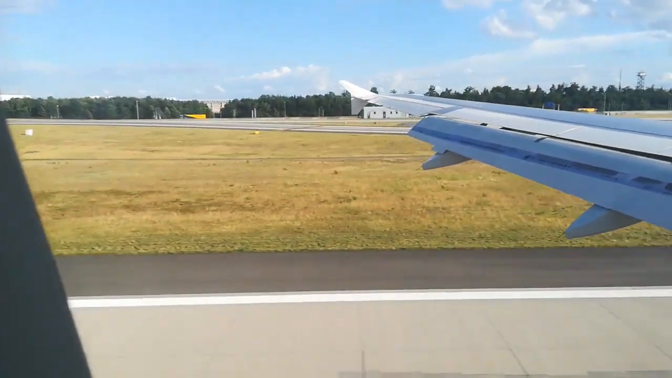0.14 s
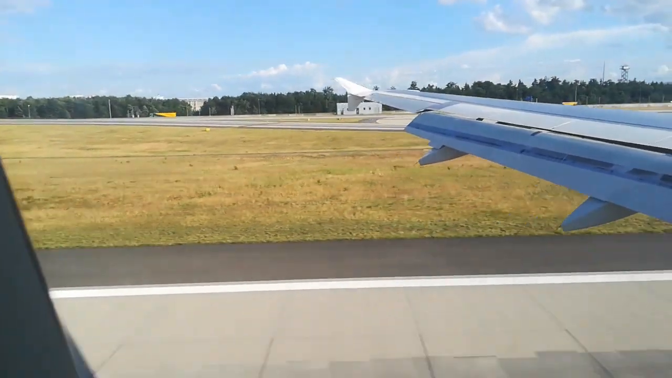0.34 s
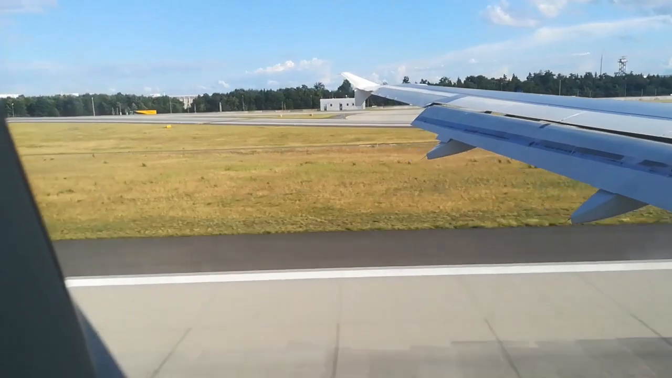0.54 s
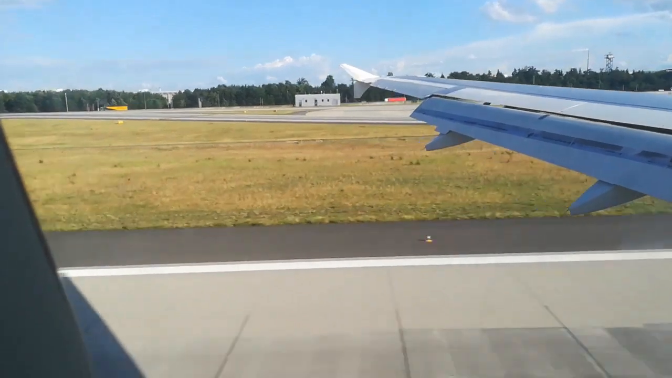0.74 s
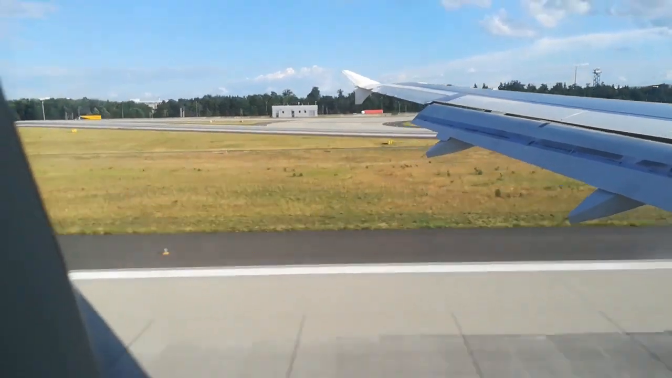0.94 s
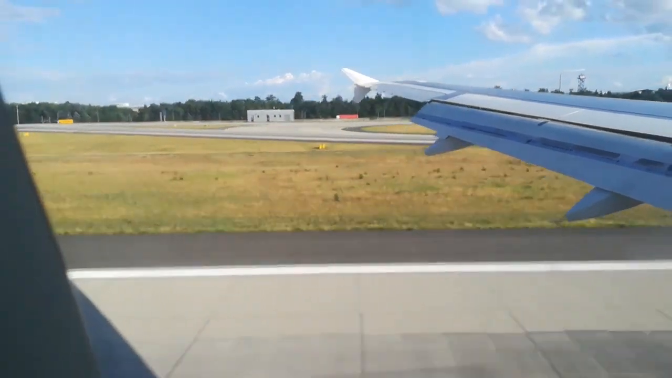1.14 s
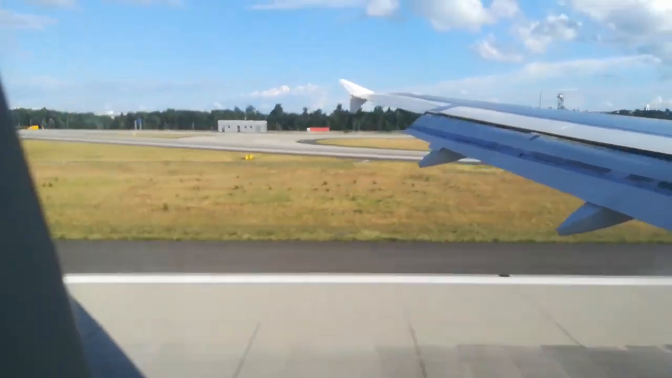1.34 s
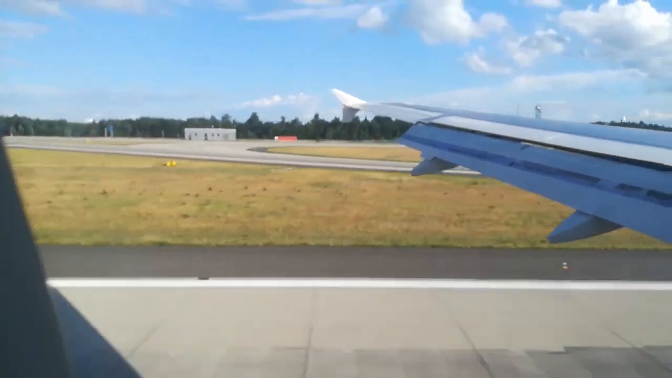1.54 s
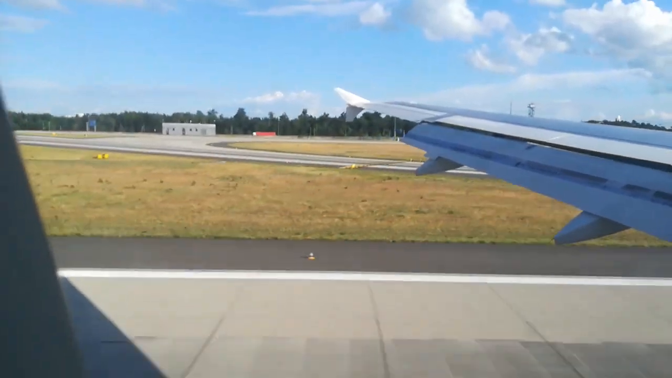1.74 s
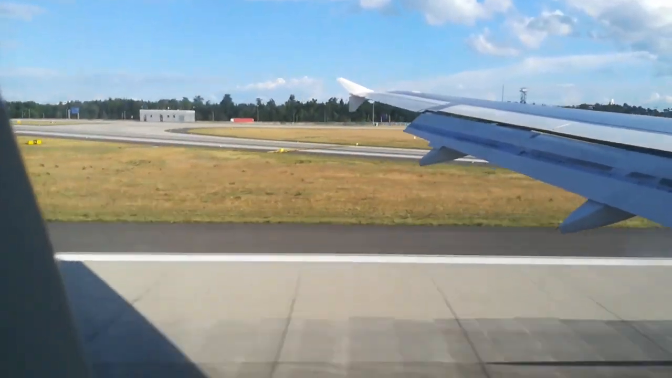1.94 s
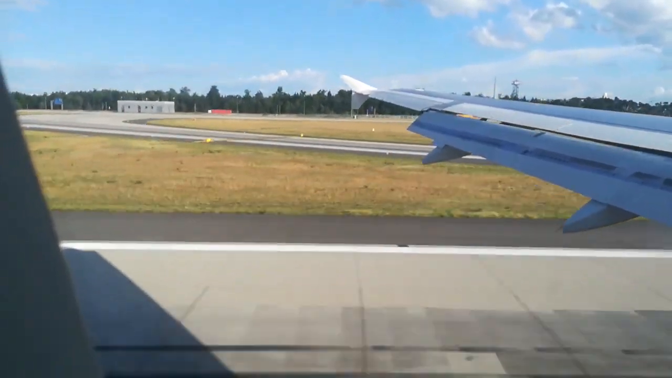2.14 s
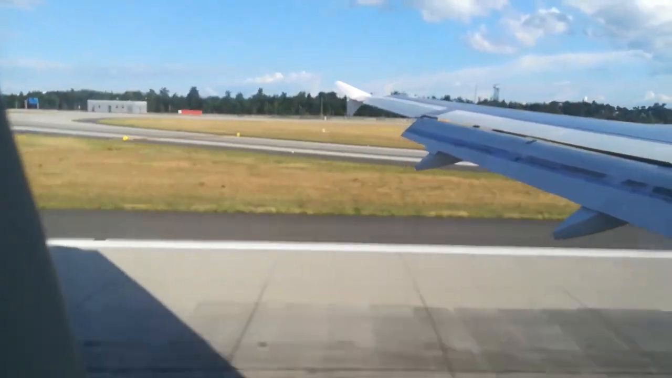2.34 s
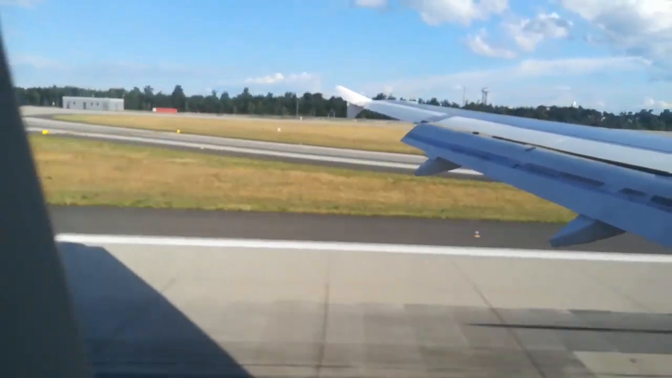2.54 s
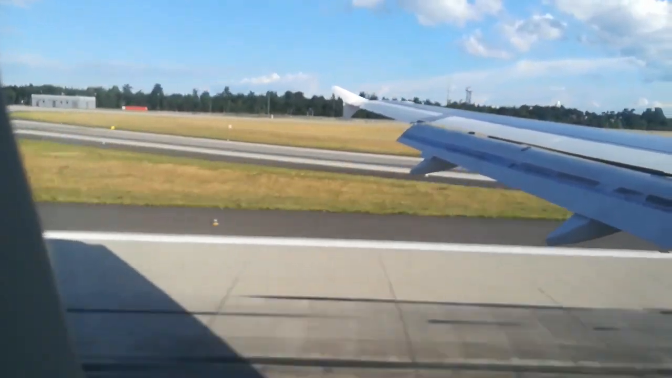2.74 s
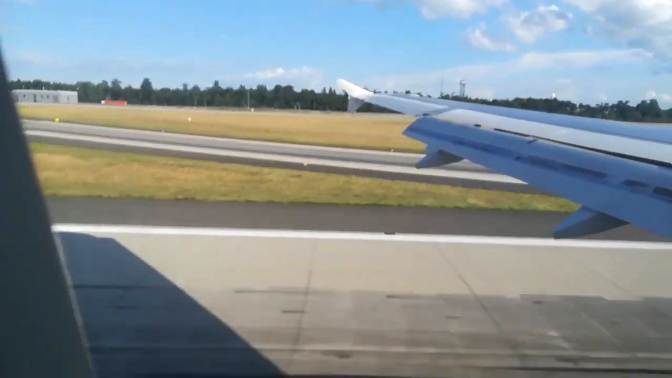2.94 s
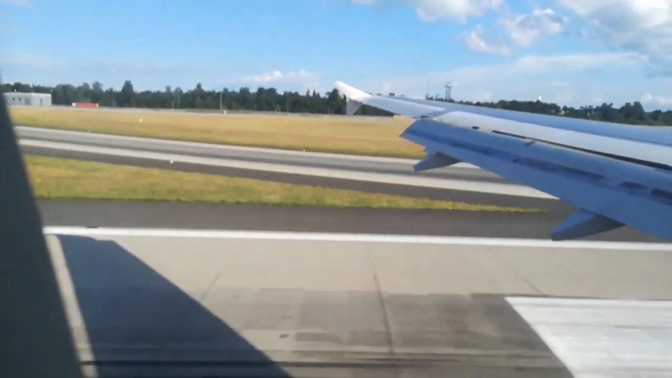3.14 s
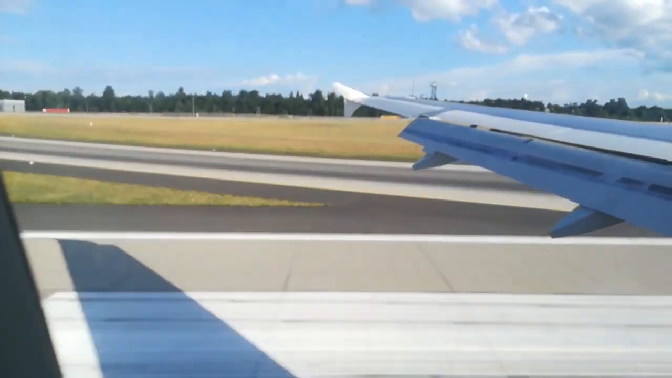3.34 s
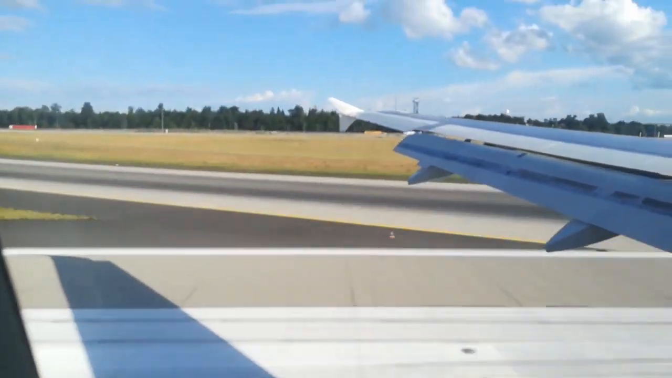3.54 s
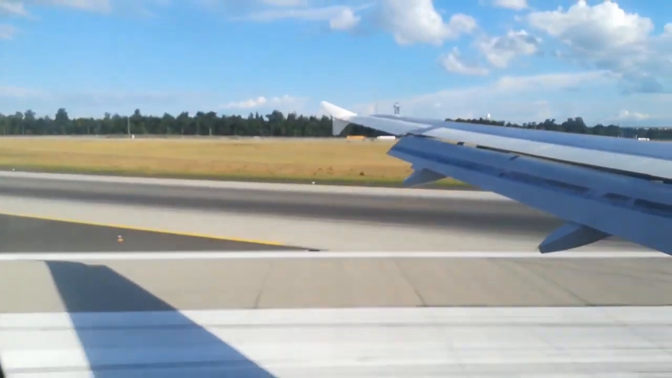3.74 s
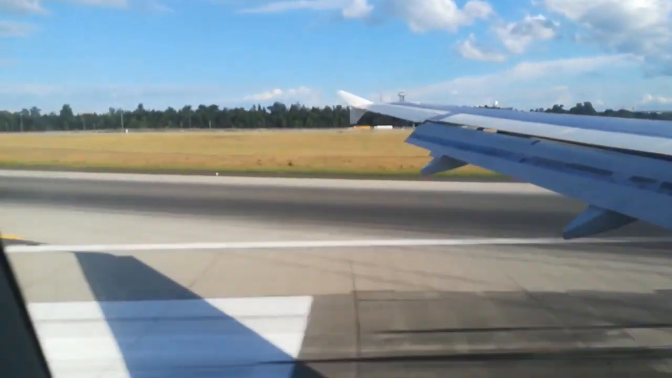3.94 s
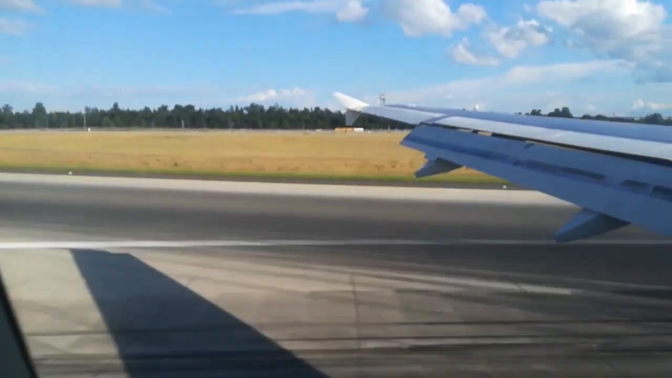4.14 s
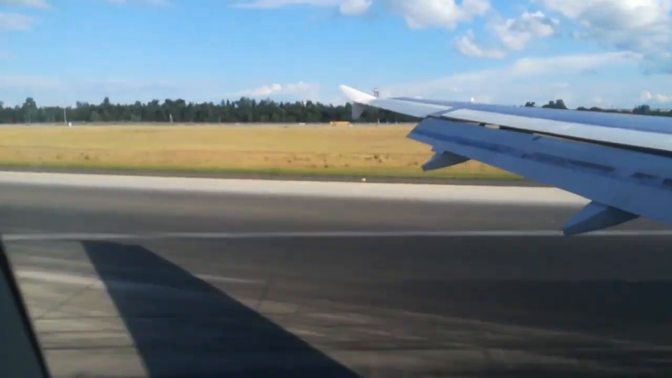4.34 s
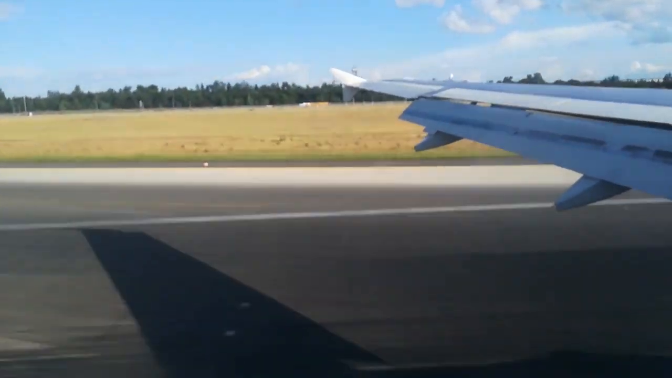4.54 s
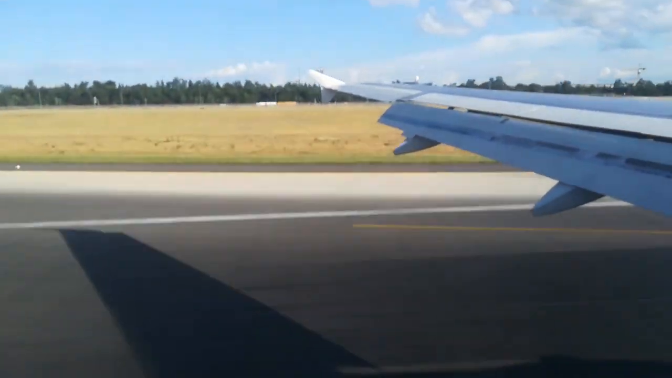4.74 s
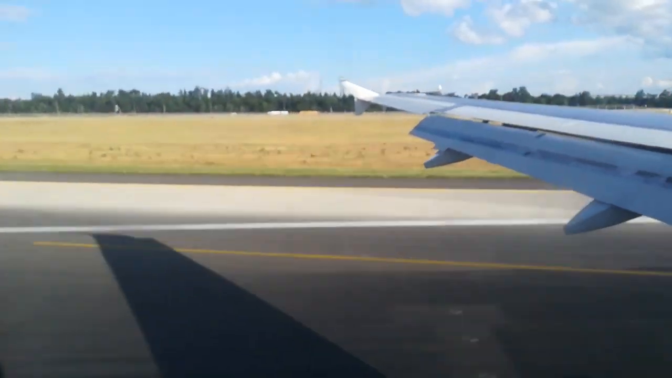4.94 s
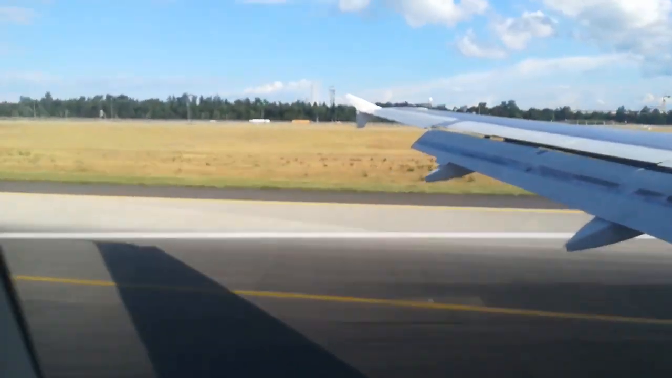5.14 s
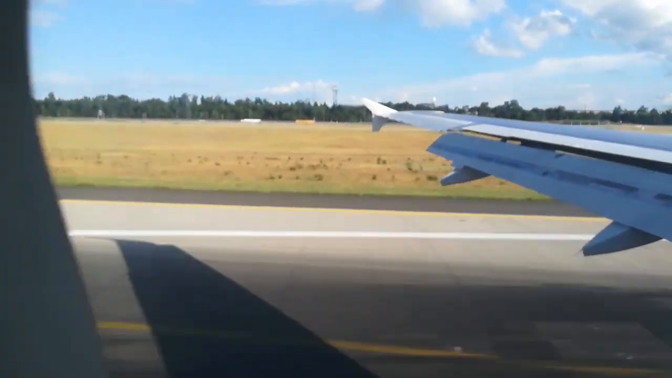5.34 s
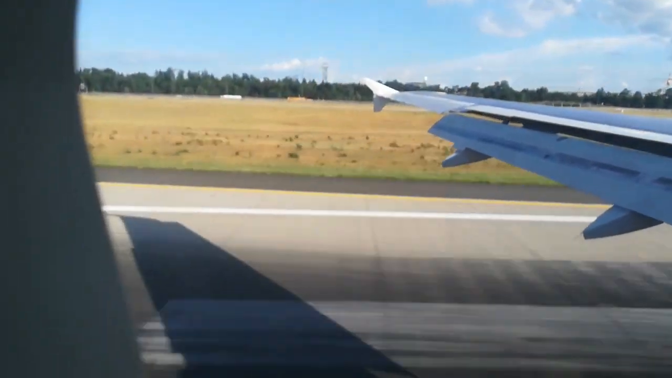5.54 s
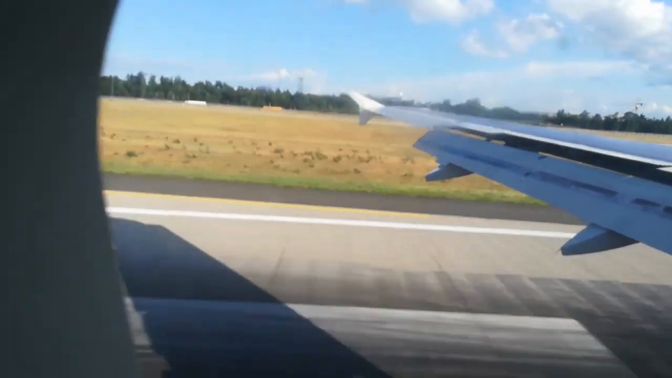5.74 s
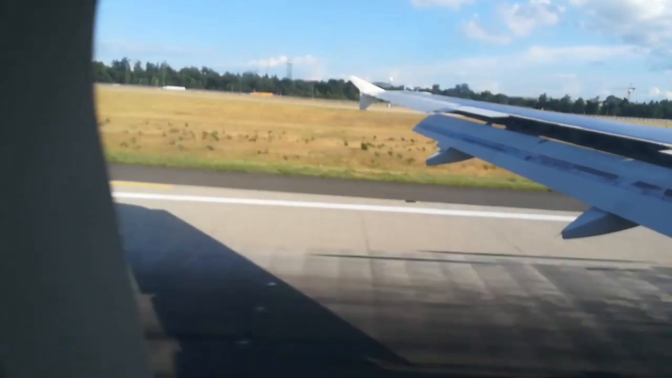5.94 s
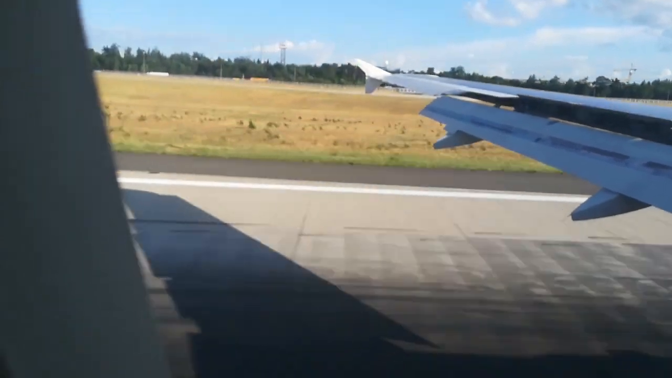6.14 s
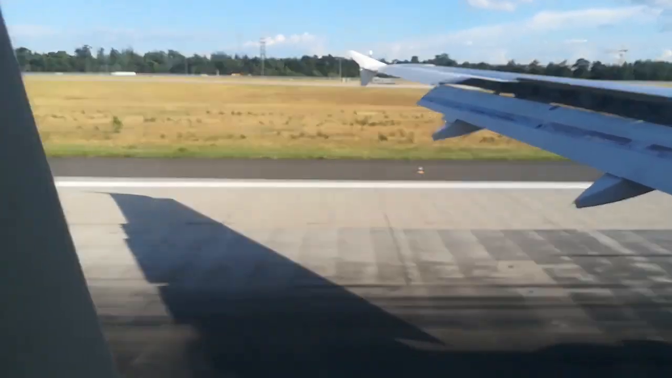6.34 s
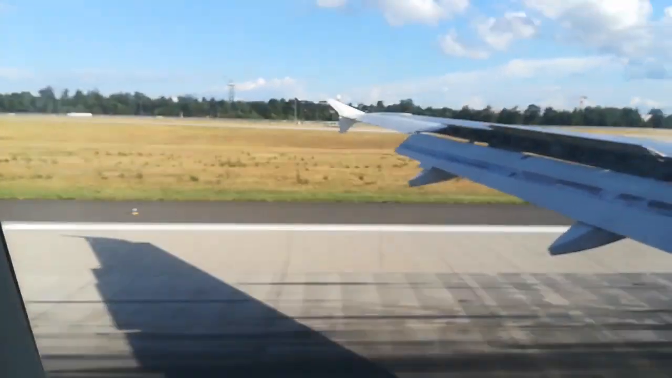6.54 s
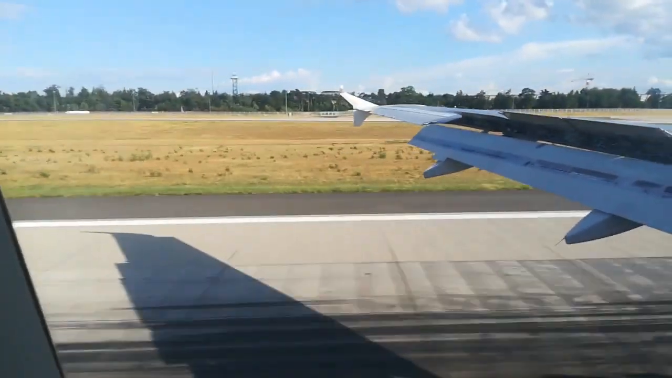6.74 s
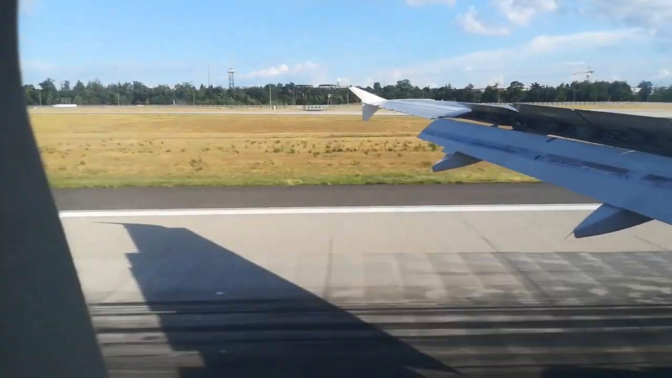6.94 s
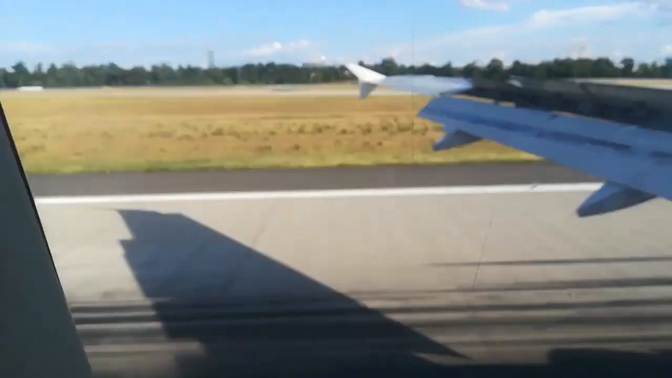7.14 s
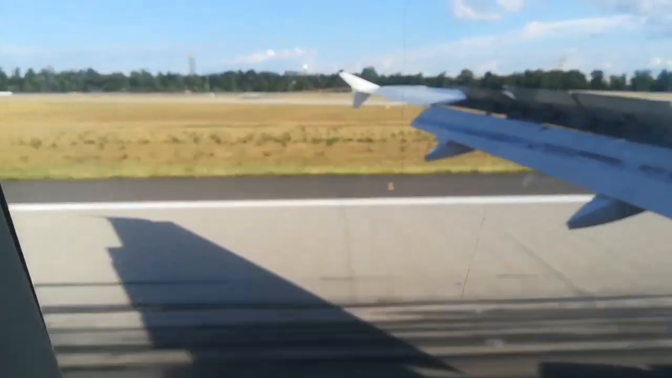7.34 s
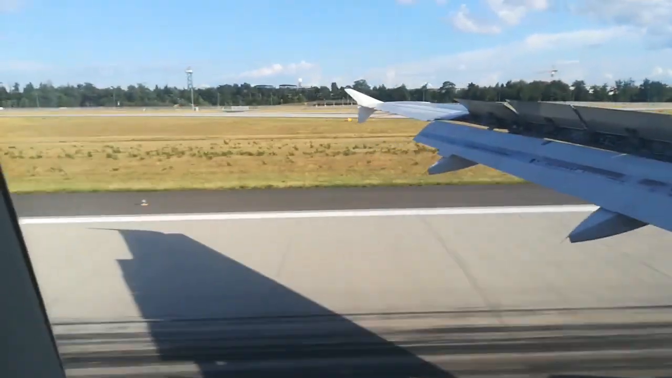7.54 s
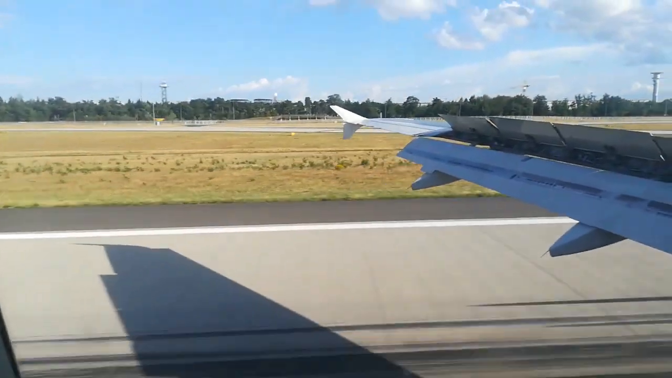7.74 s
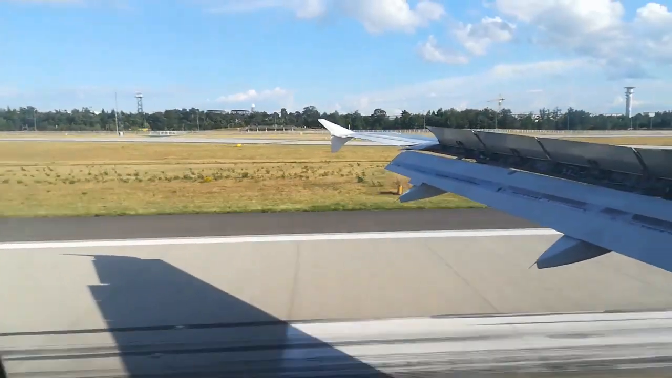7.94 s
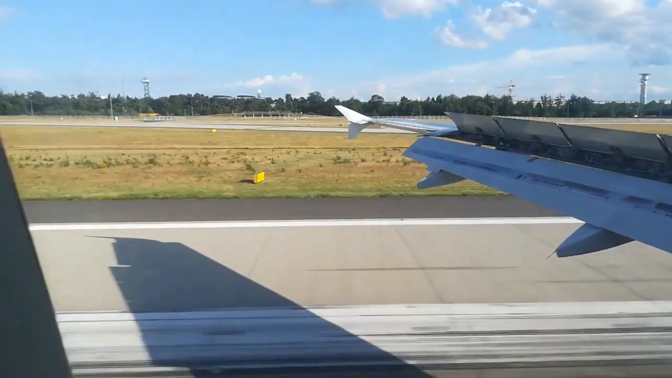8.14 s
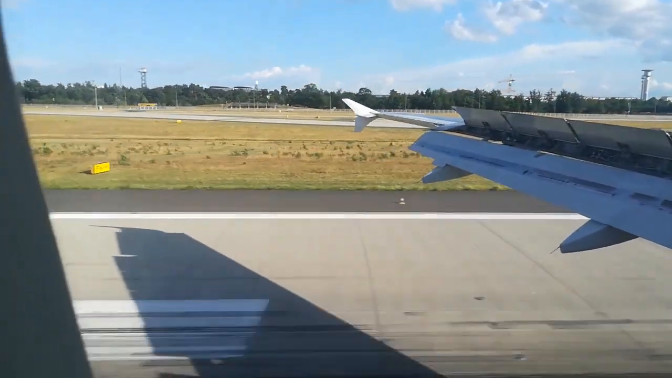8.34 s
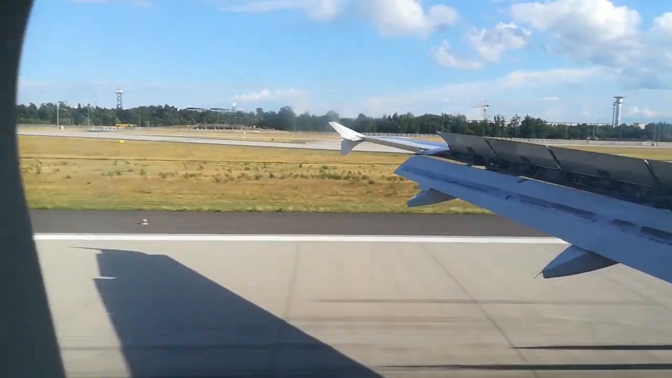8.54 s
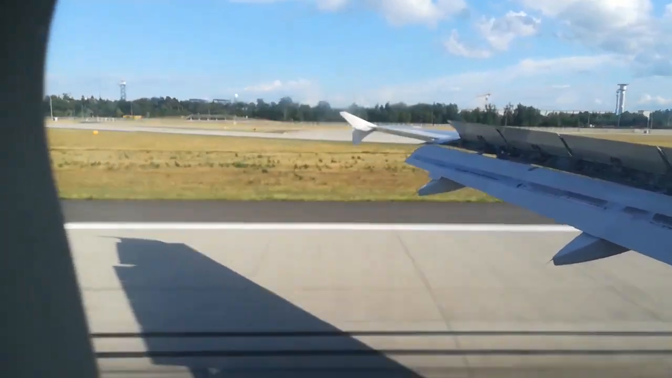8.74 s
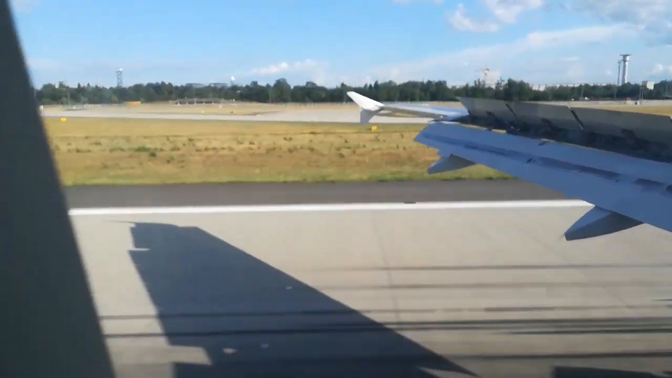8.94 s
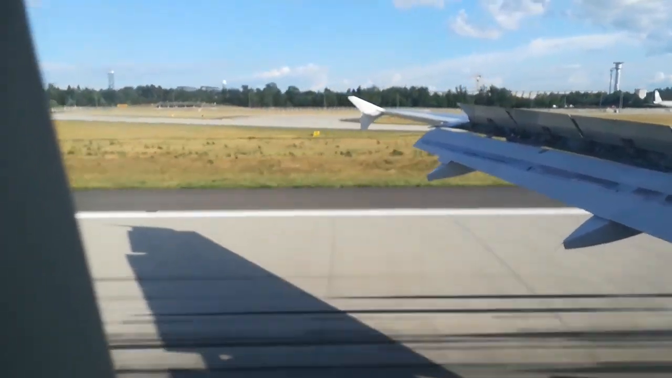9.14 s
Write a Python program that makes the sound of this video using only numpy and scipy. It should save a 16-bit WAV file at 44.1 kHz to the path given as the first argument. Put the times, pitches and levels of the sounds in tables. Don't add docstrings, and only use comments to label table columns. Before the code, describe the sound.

Heard from a window seat inside an airliner cabin, in close, slightly uneven stereo. From 0 to 4.5 s, a steady muffled rush of air and a low, wavering fuselage boom, with a faint pump whine and a lower engine tone slowly sinking; soft rustles and a tiny tick near 2.1 s. At about 4.55 to 4.7 s the wheels touch: three fast deep thumps with hard trim knocks and a brief shiver of rattling. The rumble continues, with knocks near 5.6 s. From 5.9 s the roar grows rougher and panels buzz; the pump whine drops away about 6.1 s. A sharp knock falls at 6.3 s, a low jolt at 7.3 s, then a dense rattle with bright clicks around 7.4 to 8.0 s. The rolling rumble is now much heavier, with deep jolts at 8.3 and 8.7 s, and still booming at the end, 9.3 s. Fine hiss lies underneath.

```python
import sys
import numpy as np
from scipy import signal
from scipy.fft import rfft, irfft, next_fast_len
from scipy.io import wavfile
from scipy.ndimage import uniform_filter1d

SR = 44100
rng = np.random.default_rng(int(sys.argv[2]) if len(sys.argv) > 2 else 0)


def invert_db(x):
    u = np.asarray(x, float) / 20
    return 10 ** u


def unload_wav(signal):
    wavfile.write(
        sys.argv[1],
        SR,
        np.round(np.clip(np.atleast_2d(signal).T, -1, 1) * 32767).astype(np.int16),
    )


N = 409688
M = next_fast_len(N + SR // 4)
T = np.arange(M) / SR
HZ = np.maximum(np.fft.rfftfreq(M, 1 / SR), 1)
SIDES = np.array([[.5], [-.5]])
RUSH_LAG_S = 0.00062


def rms_one(x):
    return x / np.sqrt(np.mean(x ** 2) + 1e-20)


def in_time(rows):
    s, level_db = np.transpose(rows)
    return np.interp(T, s, level_db)


def at_hz(points):
    hz, value = np.transpose(points)
    return np.interp(np.log(HZ), np.log(hz), value)


def resonances(modes):
    power = 0
    for hz, width, db in modes:
        power = power + invert_db(db) ** 2 / (1 + (2 * (HZ - hz) / width) ** 2) ** 2
    return np.sqrt(power)


def band(low_hz, high_hz):
    return 1 / np.sqrt((1 + (low_hz / HZ) ** 8) * (1 + (HZ / high_hz) ** 8))


def drift(rate_hz):
    count = M // 64 + 2
    hz = np.fft.rfftfreq(count, 64 / SR)
    slow = irfft(rfft(rng.standard_normal(count)) / (1 + (hz / rate_hz) ** 2), count)
    return np.interp(np.arange(M) / 64, np.arange(count), rms_one(slow))


def pair(gain, alike, lag_s=0., grains=1):
    mid, left, right = rfft(rng.standard_normal((3, M)) * grains)
    alike = np.clip(alike, 0, 1)
    delay = np.exp(-2j * np.pi * HZ * lag_s * np.array([[1], [0]]))
    shared = np.sqrt(alike) * mid * delay
    own = np.sqrt(1 - alike) * np.array([left, right])
    return rms_one(irfft(gain * (shared + own), M))


def evened(x, span_s, share):
    span = int(span_s * SR)
    power = uniform_filter1d(uniform_filter1d(x.mean(0) ** 2, span), span)
    level = np.sqrt(power + 1e-3)
    return rms_one(x / level ** share)


# t/s, level/dB
LOAD = [(0, -31), (1.3, -30.5), (2.2, -32.5), (4.2, -32), (4.55, -30), (5.3, -30), (5.9, -30), (6.3, -28),
        (7.3, -26), (7.8, -24), (8.2, -25), (8.62, -23.5), (8.8, -26), (9.29, -25)]


def driven(flare_db, share):
    load_in_flare_db = -31
    return flare_db + share * (in_time(LOAD) - load_in_flare_db)


def spoilers():
    up_s, ease_s, rise_s = 5.89, 8.53, .3
    return np.clip(np.minimum(T - up_s, ease_s - T) / rise_s, 0, 1)


# f/Hz, level/dB per Hz
HISS = [(5000, -16), (8000, -3), (10000, -5), (12500, 5), (14500, 6), (15800, -8)]


def microphone_hiss():
    return invert_db(-79.5) * pair(invert_db(at_hz(HISS)) * band(5000, 15800), 0)


# f/Hz, level/dB, pan/dB
FAINT_LINES = [(11199, -94, -8), (11997, -97, -8), (12796, -95, -8), (13598, -93, -6), (14408, -94, 4),
               (15196, -97, -8)]


def electrical_lines():
    out = 0
    for hz, db, pan_db in FAINT_LINES:
        level_db = db - .6 * T + 4.4 * drift(0.8)
        out = out + invert_db(level_db + pan_db * SIDES) * np.sin(2 * np.pi * hz * T)
    return out


def whine(hz, level_db, wander_hz, right_phase):
    turn = 2 * np.pi * np.cumsum(hz + wander_hz * drift(3)) / SR
    return invert_db(level_db) * invert_db([[3], [-3]]) * np.sin(turn + np.array([[0], [right_phase]]))


def pump():
    start_s, stop_s = .35, 6.1
    running = np.clip(np.minimum(T - start_s, stop_s - T) / 0.15, 0, 1)
    level_db = -60 - 12 * (1 - running) + 3.2 * drift(2.5)
    return whine(920 - 1.1 * T, level_db, 2.5, 2.6)


def engine_shaft():
    idle_hz = 403.7
    hz = np.maximum(468.2 - 13 * T, idle_hz)
    level_db = driven(-52.5, 0.97) - 12 * (T < .35) + 1.2 * drift(3)
    return whine(hz, level_db, 1.5, 1.6)


# f/Hz, level/dB per Hz
RUSH = [(260, -8.5), (450, 0), (485, -2), (597, -11), (866, -11), (933, -8.5), (976, -14), (1260, -18),
        (1460, -21), (2150, -21.5), (2690, -23.5), (2940, -22.5), (6280, -36.5), (9240, -39), (15800, -43)]


def air_rush():
    level_db = driven(-48.5, 0.2) + 1.46 * spoilers() + 0.71 * drift(3.3)
    alike = 1.055 / (1 + (HZ / 1100) ** 2)
    return invert_db(level_db) * pair(invert_db(at_hz(RUSH)) * band(413, 14600), alike, RUSH_LAG_S)


# f/Hz, level/dB per Hz
CHATTER = [(1500, -8), (3000, -11), (5000, 7.5), (7000, 4.5), (9500, 1.5), (13000, -8), (15800, 1.5)]
# centre t/s, spread t/s, level/dB
FLURRIES = [
    (1.8, 0.17, 1),
    (4.78, .08, 8),
    (4.6, 0.072, 8),
    (5.4, .2, 6),
    (6.68, .07, 8),
    (8.3, 0.091, 3),
    (7.1, 0.091, 5),
    (7.92, 0.22, 8),
]


def trim_chatter():
    level_db = driven(-73, 0.6) + 1.5 * drift(3.9)
    for s, spread_s, db in FLURRIES:
        level_db = level_db + db * np.exp(-((T - s) / spread_s) ** 2 / 2)
    contacts = rng.random(M) < 5000 / SR
    grains = invert_db(1.9 * np.minimum(rng.exponential(1, M), 3)) * contacts
    return invert_db(level_db) * pair(invert_db(at_hz(CHATTER)) * band(1500, 17000), 0.04, grains=grains)


# t/s, middle level/dB, dull level/dB, bright level/dB, pan/dB
KNOCKS = [(4.1864, -51, -56, -52, -4), (4.5292, -41, -47, -57, 13), (4.5386, -34.5, -42, -51, -5),
          (4.5447, -48, -35, -46, 4), (4.5595, -34, -34, -48, -3), (5.5233, -53, -57, -52, 0.5),
          (5.5866, -40, -53, -36, -1.5), (6.04, -49, -46, -69, -2), (6.2144, -54, -44, -61, -1),
          (6.3245, -28.5, -44, -57, -3), (6.336, -41, -42, -56, 7), (6.8144, -53, -57, -49, 1),
          (7.4393, -46, -42, -48, -3), (7.472, -47, -49, -46.5, -6), (7.653, -48, -54, -66, 7),
          (7.758, -43, -54, -44, 1), (7.832, -35.5, -41, -54, 0), (7.8544, -43, -38, -63, 2),
          (8.0182, -44, -45.5, -52, 5)]
# t/s, middle level/dB, dull level/dB, bright level/dB, pan/dB
TICKS = [(2.1297, -68, -70, -37.5, 3), (2.134, -66, -70, -44, 0), (2.1385, -63, -70, -54, 6),
         (3.127, -57, -60, -49, -2), (4.7235, -62, -56, -50, 16), (5.917, -55, -60, -45, -5),
         (6.171, -60, -60, -51, 10), (7.7585, -38, -56, -37, -5), (7.762, -51, -53, -39, 3),
         (7.825, -55, -50, -48, -6), (8.3414, -47, -40, -46, 8), (8.788, -53, -51, -49, -3),
         (9.047, -59, -56, -51, -2)]
# t/s, middle level/dB, bright level/dB
RUSTLES = [(0.1794, -50, -59), (0.3394, -50, -59), (0.4594, -51, -64), (1.33, -58, -60), (1.5694, -55, -64),
           (1.7494, -53, -58), (1.8394, -52, -57), (3.0494, -56, -62), (3.5894, -53, -66),
           (4.3494, -53, -57.5), (4.6294, -49, -57), (4.6994, -49.5, -56), (4.7444, -49.5, -48),
           (5.0194, -61, -54), (5.2424, -64, -53.5), (5.2994, -51, -53), (5.4394, -49, -63),
           (5.6724, -49, -60), (6.5194, -49.5, -53), (6.6149, -55, -52), (6.6474, -61, -49),
           (7.0694, -52, -57), (7.196, -47.5, -60), (7.5644, -47, -46), (7.6094, -58, -56),
           (7.7094, -45, -47), (8.0202, -42, -48), (8.1694, -53, -50), (8.6194, -57, -54), (8.93, -56, -57)]


def sprays(column):
    envelope, age = np.zeros((2, M)), T[:int(.3 * SR)]
    rustles = [(s, db, db + 4.5, bright_db, -2) for s, db, bright_db in RUSTLES]
    kinds = (   # rows, rise s, t60 s, lift dB
        (KNOCKS, 0.0017, 0.091, -5.5),
        (TICKS, .0001, 0.0041, 3.4),
        (rustles, 0.0094, 0.16, -3.5))
    for rows, rise_s, t60, lift_db in kinds:
        shape = (1 - np.exp(-age / rise_s)) * invert_db(lift_db - 60 * age / t60)
        for row in rows:
            start = int(row[0] * SR)
            envelope[:, start:start + len(age)] += invert_db(row[column] + row[4] * SIDES) * shape
    return envelope


# f/Hz, width f/Hz, level/dB
TRIM_MODES = [(790, 260, -2), (1240, 720, -1.5), (1750, 620, -9), (2320, 83, -14.5), (3480, 2700, -26),
              (4430, 550, -17), (5080, 190, -14.5), (5700, 310, -14), (6900, 240, -12), (8300, 2200, -14),
              (10700, 600, -7), (14200, 3600, 2.5)]


def knocks():
    colour = resonances(TRIM_MODES) + .4
    grains = invert_db(3.3 * np.minimum(rng.exponential(1, M), 4)) * rng.standard_normal((2, M))
    grains = rms_one(grains)
    dull, middle, bright = (2, 260, 1930), (1, 3080, 4620), (3, 7500, 8600)   # column, low Hz, high Hz
    out = 0
    for column, low_hz, high_hz in (dull, middle, bright):
        out = out + rfft(sprays(column) * grains) * rms_one(colour * band(low_hz, high_hz))
    return irfft(out, M)


# t/s, f/Hz, level/dB, t60 t/s
RINGS = [(4.539, 4540, -39, .05), (4.539, 1750, -36, .08), (4.56, 1050, -32.5, 0.057),
         (4.561, 4000, -35, 0.035), (5.589, 7340, -45, .03), (5.589, 14540, -44, .05),
         (6.042, 4200, -44, 0.022), (6.33, 4000, -40, .025), (6.329, 960, -35.5, 0.056),
         (6.618, 1400, -45, .04), (6.812, 5100, -52, .05), (7.834, 2900, -40, .04), (7.835, 1790, -43, .05),
         (4.546, 2000, -42, .05), (7.81, 1450, -44, .04), (6.66, 13900, -54, .04), (7.759, 5700, -40, .025),
         (7.653, 4400, -44, .03), (7.759, 2550, -40, .03), (7.759, 6900, -30, .025),
         (7.759, 10850, -42, 0.022), (8.021, 4910, -41.5, 0.045), (8.034, 4900, -50, .06),
         (7.912, 15000, -60, 0.11)]


def rings():
    out, age = np.zeros((2, M)), T[:int(.15 * SR)]
    for s, hz, db, t60 in RINGS:
        start = int(s * SR)
        shape = (1 - np.exp(-age / 0.00051)) * invert_db(db - 60 * age / t60)
        phase = rng.uniform(0, 5.0, (2, 1))
        out[:, start:start + len(age)] += shape * np.sin(2 * np.pi * hz * age + phase)
    return out


# f/Hz, correlation
LIKENESS = [(60, 0.99), (130, 1), (290, 0.86), (640, -0.33), (1410, -0.02), (3100, -0.13), (6820, -0.01),
            (15000, 0.0)]
# f/Hz, level/dB per Hz
ROLL = [(47, -82), (80, -1.5), (124, -5.5), (167, -7.5), (240, -13), (301, -16.5), (406, -23), (538, -35),
        (700, -39), (910, -66), (1540, -120)]
# f/Hz, width f/Hz, level/dB
ROLL_MODES = [(107.2, 7.6, -0.5), (158, 27.5, -1.5), (180, 16, 0.5), (199, 24, -7), (246, 31, -5.5),
              (338.7, 11.5, -6)]
# f/Hz, width f/Hz, level/dB
SIDEWALL = [(610, 200, 4), (746, 190, 0), (1040, 210, -6.5)]


def rolling_rumble():
    alike = at_hz(LIKENESS)
    panels = invert_db(at_hz(ROLL)) * (1 + resonances(ROLL_MODES))
    roll = pair(panels * band(78.2, 243), alike)
    skin = pair(panels * band(237.5, 820), alike, lag_s=0.0003)
    buzz = pair(resonances(SIDEWALL), 0.39, RUSH_LAG_S)
    roll_db = driven(-31, 1.0)
    skin_db = driven(-40, 0.61) + 3 * spoilers()
    buzz_db = 2 * uniform_filter1d(skin_db, SR // 3) + 14.5
    out = invert_db(roll_db) * evened(roll, 0.026, 0.39)
    out += invert_db(skin_db) * evened(skin, 0.028, 0.14)
    return out + invert_db(buzz_db) * buzz


# centre t/s, f/Hz, level/dB, swell t/s
THUMPS = [
    (4.575, 63, -16, .017),
    (4.649, 68, -11, .015),
    (4.712, 52, -14, .02),
    (7.32, 55, -15.5, .026),
    (8.29, 68, -14.5, .026),
    (8.68, 58, -12, .02),
]


def thumps():
    out, grip = np.zeros((2, M))
    age = T[:int(.2 * SR)] - .1
    for s, hz, db, swell_s in THUMPS:
        start = int((s - .1) * SR)
        swell = np.exp(-(age / swell_s) ** 2 / 2)
        out[start:start + len(age)] += invert_db(db) * swell * np.cos(2 * np.pi * hz * age)
        grip[start:start + len(age)] += np.exp(-(age / swell_s) ** 2 / 6)
    return out, np.minimum(grip, 1)


# f/Hz, width f/Hz, level/dB
HULL_MODES = [(39.6, 26, -6), (51.5, 7.7, -2), (68.1, 17.2, -5), (87.3, 11.3, -9.5)]
# t/s, level/dB
BUFFET = [(0.0, -41), (0.1, -28.5), (0.72, -27.5), (0.77, -36), (1.22, -23.5), (1.4, -29.5), (4.17, -28),
          (4.71, -17), (4.81, -27), (6.88, -25), (8.36, -20.5), (8.46, -34), (8.49, -22), (8.67, -19),
          (8.77, -28), (9.0, -20), (9.11, -34.5), (9.29, -14)]


def hull():
    alike = at_hz(LIKENESS)
    sway = pair(resonances(HULL_MODES[:2] + [(29.5, 33, -11.5)]), alike)
    boom = pair(resonances(HULL_MODES[2:]), alike)
    buffet_db, trade_db = in_time(BUFFET), 3.5 * drift(2.74)
    modes = invert_db(buffet_db - 1.5 + trade_db) * evened(sway, .06, .5)
    modes += invert_db(buffet_db - 4 - trade_db) * evened(boom, .05, .5)
    jolts, grip = thumps()
    return modes * (1 - .85 * grip) + jolts


# f/Hz, level/dB
BALANCE_DB = [(60, -0.5), (92, 0.5), (140, -1), (210, 2), (330, 0), (500, 0), (770, 1.5), (1170, 3),
              (1790, 4.5), (2740, 1), (4190, 1.5), (6410, -3), (9810, -11.5), (15000, -9.5)]
# f/Hz, width f/Hz, level/dB
LEFT_PORT = [(650, 35, -13), (2100, 300, -20), (3130, 280, -12), (5000, 750, -1.5), (8400, 500, -18.5),
             (14300, 1600, -4)]
# f/Hz, width f/Hz, level/dB
RIGHT_PORT = [(728, 87, -6), (1160, 115, -11.5), (2090, 590, -10), (3240, 300, -23), (9230, 960, -13.5),
              (12500, 900, -19)]


def ports(x):
    tilt = invert_db(at_hz(BALANCE_DB) * SIDES)
    cavities = 1 + np.array([resonances(LEFT_PORT), resonances(RIGHT_PORT)])
    return irfft(rfft(x) * tilt * cavities, M)


def scene():
    tones = electrical_lines() + pump() + engine_shaft()
    air = air_rush()
    trim = trim_chatter() + knocks() + rings()
    fuselage = rolling_rumble() + hull()
    return ports(tones + air + trim + fuselage)[:, :N]


def band_limit(x):
    return signal.sosfilt(signal.butter(12, 15800, fs=SR, output="sos"), x)


def record(dry):
    mix = dry + microphone_hiss()[:, :N]
    return band_limit(mix)


dry = scene()
out = record(dry)
unload_wav(out)
```